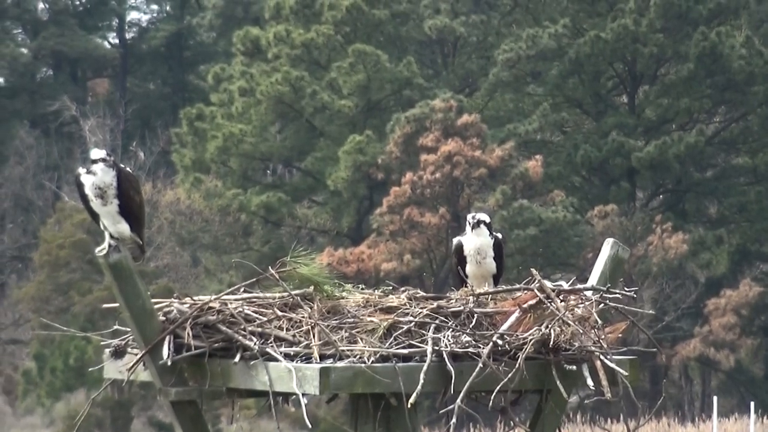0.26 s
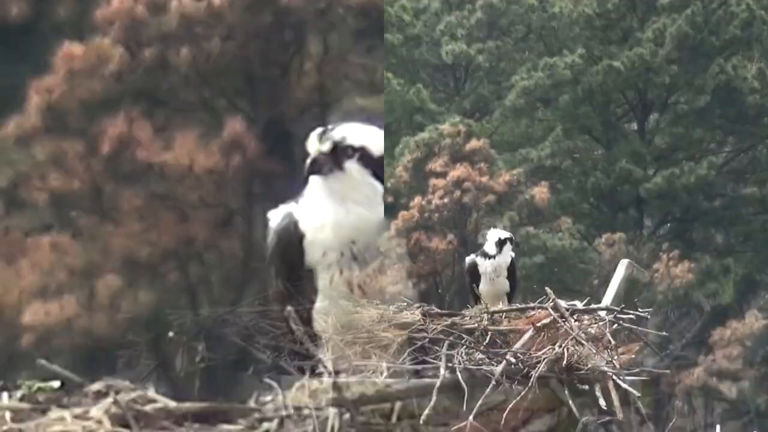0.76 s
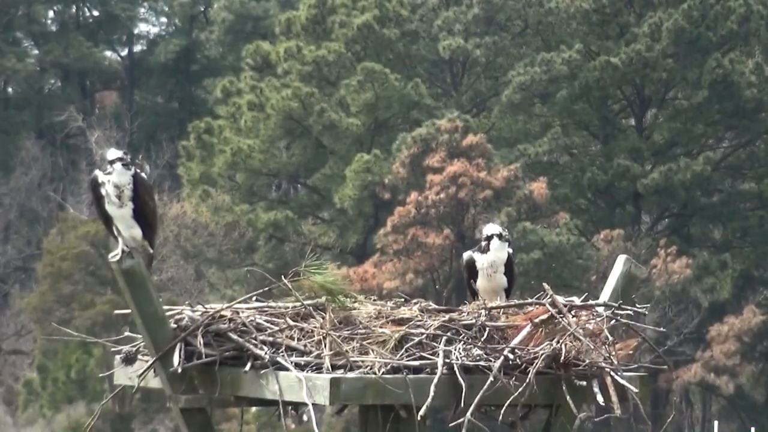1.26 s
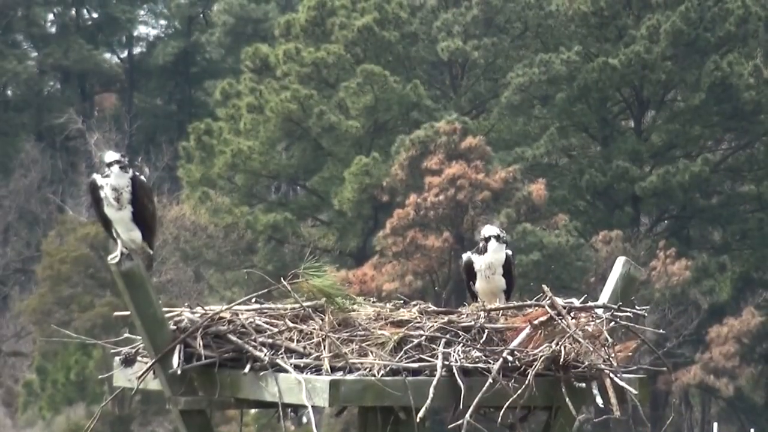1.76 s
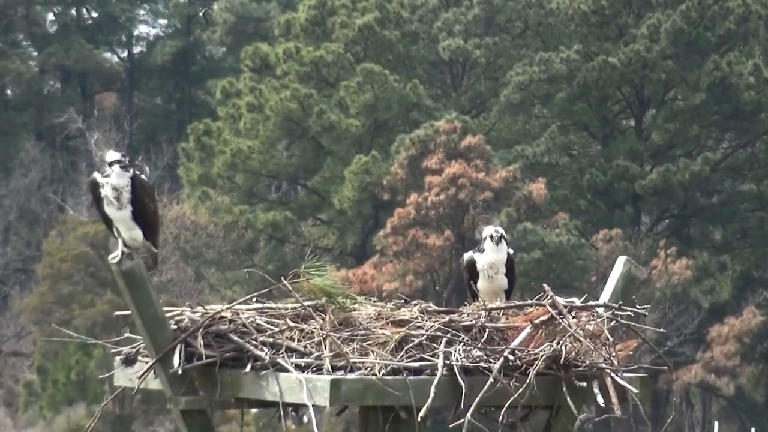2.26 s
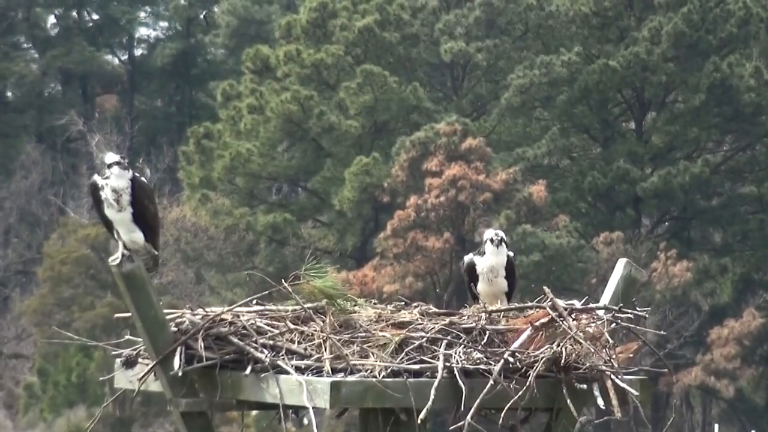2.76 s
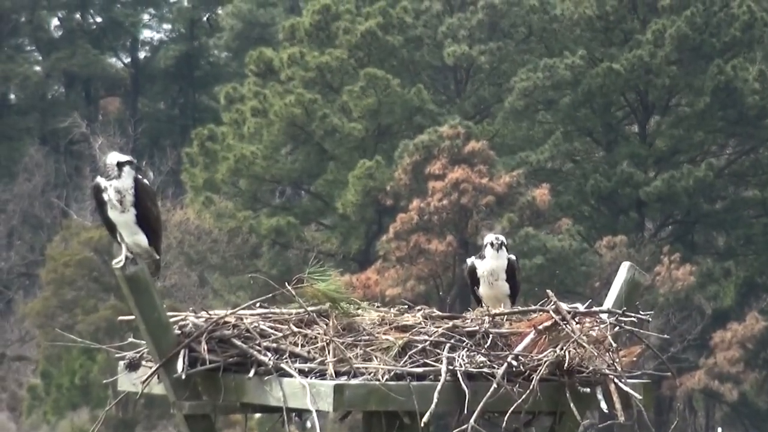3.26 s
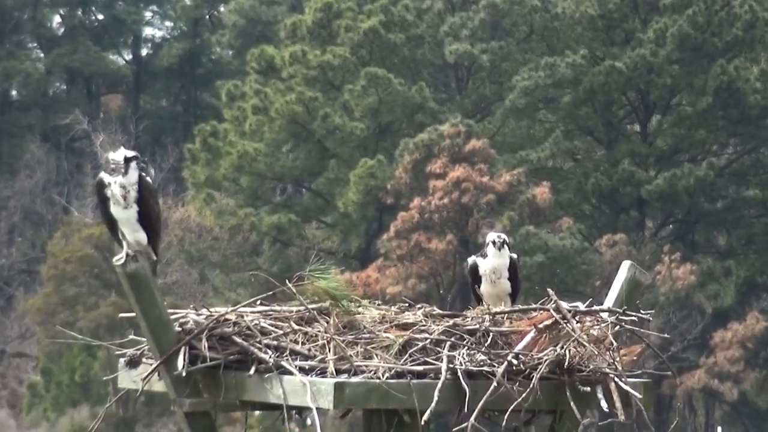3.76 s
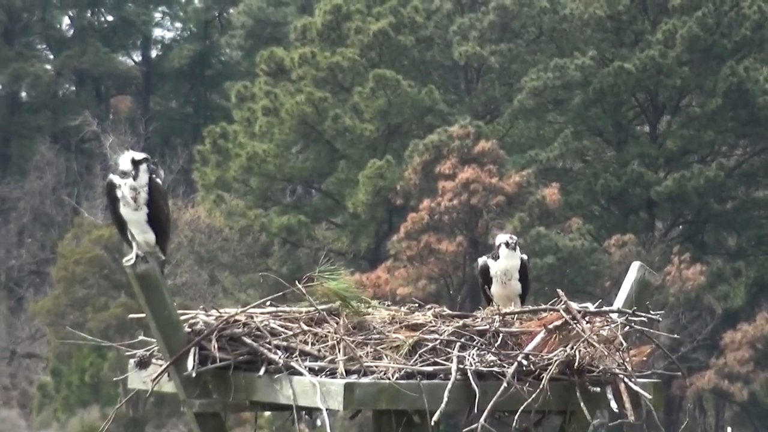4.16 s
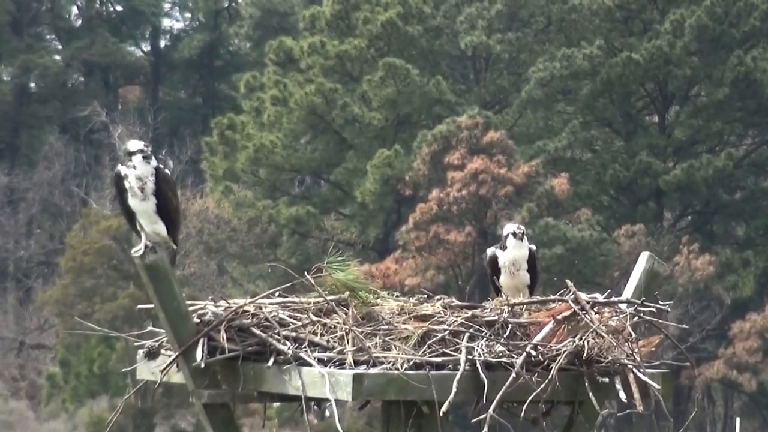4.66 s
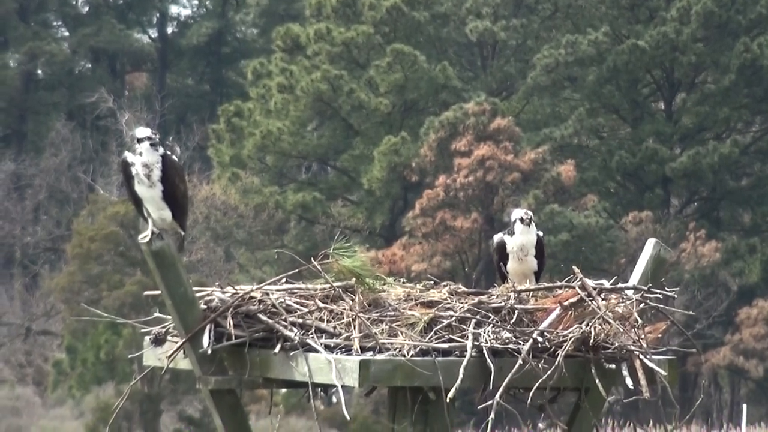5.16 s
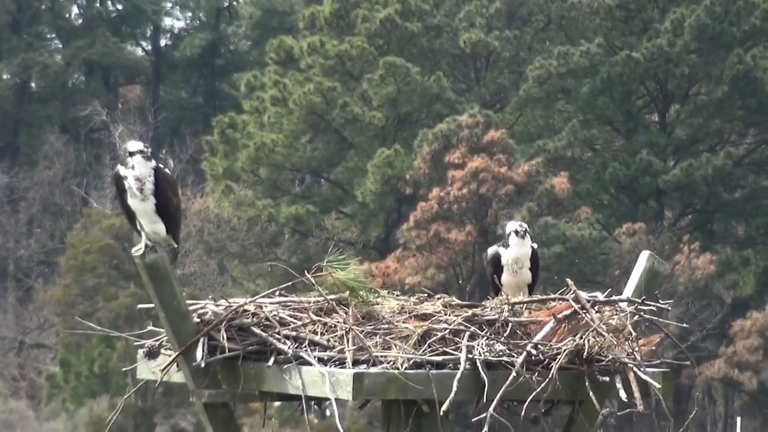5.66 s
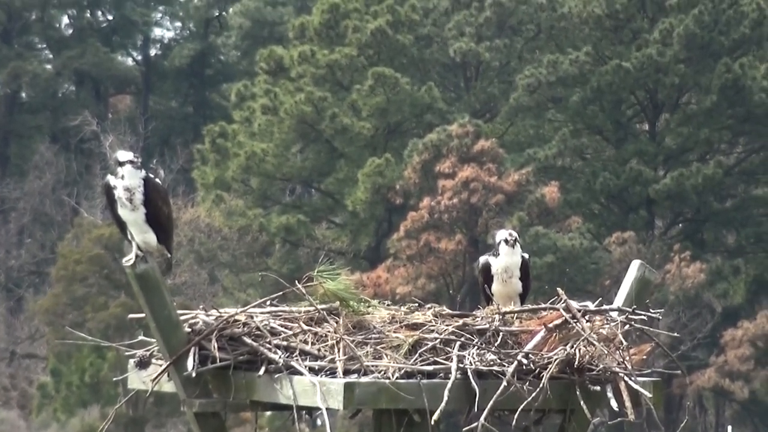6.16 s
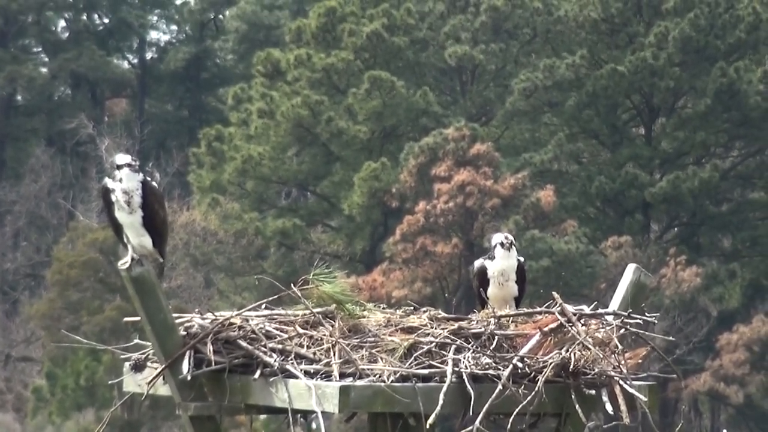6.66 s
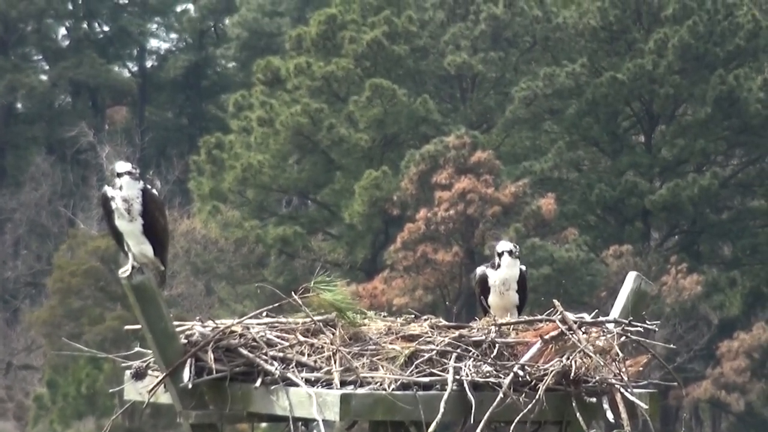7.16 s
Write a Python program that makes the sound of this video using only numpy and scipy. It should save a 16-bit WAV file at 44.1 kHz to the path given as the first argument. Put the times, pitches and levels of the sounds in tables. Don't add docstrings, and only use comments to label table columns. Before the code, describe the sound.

Sharp breaking osprey whistles in two quick bursts with a pause between, over low wind rumble, soft hiss and a faint engine drone.

```python
import sys
import numpy as np
from scipy import signal
from scipy.fft import rfft, irfft, next_fast_len
from scipy.io import wavfile
from scipy.ndimage import uniform_filter1d, map_coordinates

SR = 44100
rng = np.random.default_rng(int(sys.argv[2]) if len(sys.argv) > 2 else 0)


def unload_wav(signal):
    wavfile.write(
        sys.argv[1],
        SR,
        np.round(np.clip(np.atleast_2d(signal).T, -1, 1) * 32767).astype(np.int16),
    )


def linear_from_db(decibels):
    return 10 ** (np.asarray(decibels, float) / 20)


N = 326340

# register break in seconds, low lead-in in seconds,
# high arc in seconds, crest in Hz, level in dB.
CALLER_CHIRPS = [(.956, 0.022, 0.063, 2737.5, -24.5), (1.163, 0.026, 0.062, 2753.5, -28),
                 (1.343, .027, 0.068, 2778.5, -26), (1.539, 0.029, 0.063, 2830, -25),
                 (1.727, 0.026, 0.071, 2807, -25), (1.94, 0.041, 0.057, 2784.5, -27),
                 (2.149, 0.038, 0.053, 2719.5, -23), (3.919, 0.028, 0, 0, -24),
                 (4.097, 0.028, 0.069, 2957, -25), (4.277, 0.023, 0.076, 2886, -28.5),
                 (4.471, 0.03, 0.072, 2882.5, -25.5), (4.653, 0.024, 0.071, 2878.5, -21.5),
                 (4.851, 0.03, 0.066, 2874, -19.5), (5.035, 0.031, 0.065, 2852, -17.5),
                 (5.225, .029, 0.069, 2818, -19.5), (5.428, 0.003, 0.056, 2810, -23.5),
                 (5.65, 0.077, 0.0026, 0, -22.5)]
# start in seconds, length in seconds, crest in Hz, level in dB.
UNBROKEN_CHIRPS = [
    (2.342, 0.089, 2128, -28.5),
    (2.579, 0.079, 2090, -55),
    (3.715, 0.094, 2734, -35.5),
]
# start and length in seconds, from Hz, to Hz, level in dB.
VOICE_CRACKS = [
    (3.912, 0.031, 2974, 3400, -32),
    (4.116, 0.02, 3630, 3694, -36),
]
# start and length in seconds, from Hz, to Hz, level in dB.
FALLING_ENDS = [
    (.811, 0.02, 2634, 2450, -36),
    (3.949, 0.035, 2880, 2480, -31.5),
    (5.65, 0.038, 2730, 2360, -22.5),
]
# start and length in seconds, from Hz, to Hz, level in dB.
TIRED_LEADS = [
    (5.389, 0.049, 1894, 2500, -36.5),
]
# start and length in seconds,
# from Hz, to Hz, level in dB.
MATE_WHISTLES = [(1.275, .042, 2000, 1863, -58), (2.426, 0.059, 2380, 1891, -41.5),
                 (2.835, .035, 2270, 2340, -59), (2.885, .03, 2380, 2480, -57),
                 (3.601, .054, 2360, 2320, -64.5), (3.619, .023, 2620, 2627, -54),
                 (3.669, .033, 1840, 2851, -53.5), (3.703, .018, 3000, 2206, -49.5),
                 (3.742, 0.033, 1780, 1920, -42.5), (3.858, .026, 1840, 2100, -56),
                 (3.88, .038, 2400, 2150, -37.5), (4.39, .055, 2000, 1796, -54.5),
                 (5.326, .024, 2910, 3520, -59), (5.686, .041, 2300, 1910, -41),
                 (5.761, .084, 2230, 2330, -64), (7.022, .085, 2700, 1987, -33.5)]
# share of length, pitch in Hz, level in dB.
LEAD_SHAPE = [(0.079, 1876, -21), (.35, 2020, -4.5), (.6, 2110, -4), (1, 2160, -0.5)]
# share of length, pitch over crest, level in dB.
ARC_SHAPE = [(0, .965, -3.5), (.25, .998, 0.5), (.68, 1, -1.5), (.82, 0.95, 0.5), (1, 0.92, -3.5)]
# share of length, pitch over crest, level in dB.
UNBROKEN_SHAPE = [(0, .87, -14), (.28, .96, -5.5), (.57, 0.98, -1), (.79, .955, -4), (1, 0.87, -15)]
# share of length, pitch over the straight line, level in dB.
GLIDE_SHAPE = [(0, 1, -6), (.45, 1.03, 2), (1, 1, -16.5)]
FALL_SHAPE = [(0, 1, 0.5), (.4, 0.98, -1), (1, 1, -20.5)]
CRACK_SHAPE = [(0, 1, -2.5), (.45, 1, -1), (1, 1, -1.5)]
# time in seconds, amount in dB.
HOARSENESS = [(3.6, 0), (3.75, 3), (3.95, 4.5), (4.15, 2.5), (4.3, 2.5), (4.5, 1.5), (5.3, -3.5),
              (5.6, 2.5)]
LOW_OVERTONES = [-14, -21, -34, -51]
HIGH_OVERTONES = [-22.5, -27, -32.5, -49]
MATE_OVERTONES = [-34.5, -47]
# centre in Hz, width in Hz, then a list of mixtures,
# each a multiple of the note, plus or minus the buzz, level in dB.
BUZZ_UNDER_HIGH = (2180, 290, [(0, 1, -22), (1, 1, -31), (2, -1, -29), (2, 1, -36), (3, -1, -41),
                   (4, 1, -50)])
BUZZ_UNDER_LOW = (2750, 170, [(0, 1, -24), (1, 1, -30), (2, 1, -38), (3, -1, -35)])
# frequency in Hz, level in dB.
BEAK_COLOUR = [(3700, 12), (4100, -5), (4500, -3.5), (5200, 2), (5700, 0), (5950, -11.5), (7700, 4.5),
               (8400, -8), (9000, -11), (16000, -8)]
# centre in Hz, width in Hz, level in dB.
THROAT_RESONANCES = [(2310, 2400, -4.5), (3770, 1400, -4.5), (6900, 2000, -7.5), (12500, 7000, -19.5)]
# frequency in Hz, seconds to fall by 60 dB.
TREE_FADE = [(1500, 0.49), (3000, 0.31), (6000, 0.3), (12000, 0.07)]
# start in seconds, pitch in Hz, level in dB.
PEEPS = [(1.094, 3360, -59.5), (2.49, 3370, -62), (2.727, 3300, -63), (4.019, 3280, -58),
         (4.233, 3360, -56), (5.532, 3470, -57), (5.756, 3360, -55.5), (5.985, 3350, -60),
         (7.215, 3500, -62), (7.255, 3300, -65), (7.33, 3400, -61)]
# peak in seconds, half width in seconds, thump in dB.
GUSTS = [(0.082, 0.057, -17.5), (.3, 0.19, -21), (.55, 0.11, -20), (.76, 0.12, -17.5), (1.751, 0.23, -38.5),
         (2.021, 0.085, -27), (2.87, 0.039, -15), (3.06, 0.076, -24), (3.3, 0.18, -31.5),
         (3.65, 0.11, -38.5), (3.88, 0.14, -32), (4.01, 0.059, -19.5), (4.201, .12, -20),
         (4.42, 0.062, -14.5), (4.62, 0.18, -36.5), (5.581, 0.13, -27), (6.051, 0.16, -28.5),
         (6.37, 0.14, -18.5), (6.7, 0.099, -22), (6.95, 0.1, -22.5), (7.019, 0.17, -18),
         (7.172, 0.049, -21.5), (7.346, 0.033, -14)]
# level in dB under a thump of -30 dB, growth in dB per dB of thump.
SHOT_FLUTTER = [
    (-47.5, 1.61),
    (-45, 0.576),
    (-39.5, 0.88),
]
# frequency in Hz, density in dB per Hz.
THUMP_COLOUR = [(5, 23), (15, 18), (30, 18.5), (50, 7.5), (70, 2), (110, -64.5)]
FLUTTER_COLOUR = [(30, -41), (60, 1.5), (80, 0.5), (150, -5.5), (220, -17), (350, -25.5), (700, -70)]
# start in seconds, peak in dB,
# centre in Hz, width in octaves, length in seconds.
CREAKS = [(0.137, -49, 1480, 0.92, 0.0083), (0.596, -44.5, 1300, 1.25, 0.0083),
          (3.276, -62, 1400, 1.1, 0.0069), (5.37, -39, 1930, 0.59, 0.0065), (5.559, -32, 3270, 0.67, 0.014),
          (5.667, -35, 800, 0.88, 0.0096), (5.783, -45, 3470, 0.33, 0.01),
          (5.903, -67.5, 5020, 0.77, 0.0065), (6.016, -47, 3780, 0.31, 0.0071),
          (6.121, -41.5, 1790, 1.6, 0.0075), (6.388, -53, 4400, 0.4, 0.22),
          (6.576, -28, 1468, 1.59, 0.0067), (6.817, -37, 1800, 1.6, 0.0079),
          (6.974, -37.5, 9300, 2.3, 0.00077), (6.9787, -36.5, 8420, 1.5, 0.0075),
          (7.205, -60, 3240, 0.38, 0.12), (7.395, -64, 3080, 1.5, 0.0031)]
# time in seconds, firing rate in Hz, level in dB.
ENGINE_PATH = [
    (0.83, 43.38, -50.5),
    (2.37, 41.02, -50.5),
    (6.9, 42, -53),
]
# multiple of the firing rate, level in dB.
ENGINE_ORDERS = [(1, -12), (2, 0), (3, -2), (4, -10), (5, -11)]
# surf in dB, leaves in dB, circuit hiss in dB at the start,
# creep of the automatic gain in dB per second.
SHOT_AIR = [
    (-56.5, -65, -81.5, -2.5),
    (-56.5, -62, -70, 1.0945),
    (-54.5, -57.5, -67.5, -7),
]
# peak in seconds, half width in seconds, rise in dB.
BREAKERS = [
    (3.5, 0.21, 3.5),
    (6.25, 0.41, 4.5),
]
# frequency in Hz, density in dB per Hz.
SURF_COLOUR = [(90, -38.5), (150, -3.5), (230, -5.5), (290, -1.5), (355, -10.5), (410, 0), (470, -8),
               (560, -4.5), (700, -12.5), (1200, -29.5), (2600, -120)]
LEAVES_COLOUR = [(400, -28), (700, -5.5), (1100, -3), (1600, -8.5), (1850, -12), (3200, -15.5), (4500, -33),
                 (9000, -120)]
HISS_COLOUR = [(2000, -35.5), (3500, -4), (5000, -3), (8000, -5), (11200, -4.5), (11400, -2.5),
               (14000, -2.5), (16400, -2)]
# frequency in Hz, likeness from 0 to 1.
ALIKE = [(60, .45), (130, 0.99), (290, 0.87), (640, .5), (1400, 0.65), (3100, 0.74), (6800, 0.028),
         (11000, .05)]
# frequency in Hz, left minus right in dB.
PORT_LEAN = [(60, 0.5), (180, -3.5), (550, -3), (1650, -4), (4970, 0), (15000, -1.5)]
CUTS = [.8065, 6.9703]


def raptors():
    leads, arcs = chirps()
    low, low_effort = whistles(leads, LOW_OVERTONES, .0015, BUZZ_UNDER_LOW)
    high, high_effort = whistles(arcs, HIGH_OVERTONES, .0015, BUZZ_UNDER_HIGH)
    flip, flip_effort = whistles(glides(VOICE_CRACKS, CRACK_SHAPE), MATE_OVERTONES[:1], .0016)
    t = np.arange(N) / SR
    cracked = sum(1. * (t > s) * (t < s + length) for s, length, *_ in VOICE_CRACKS)
    duck = linear_from_db(-15 * uniform_filter1d(cracked, size=200))

    def throat(f):
        return sum(linear_from_db(db) * (f * w / np.abs(c * c - f * f + 1j * f * w)) ** 2
                   for c, w, db in THROAT_RESONANCES)

    breath = unit(filtered(rng.standard_normal(N), throat))
    effort = low_effort + high_effort + flip_effort
    rasp = breath * linear_from_db(-27.5 - .2 * curves(HOARSENESS)[0]) * effort
    mate = whistles(glides(MATE_WHISTLES), MATE_OVERTONES, edge=.002)[0]
    return low + high * duck + flip + rasp + mate


def chirps():
    lead_db, lead_follows = -29, .43
    bow_hz_per_s = 2100
    sag, slack_db = .013, 2.6
    break_hz = 2400
    low, high = glides(TIRED_LEADS), glides(FALLING_ENDS, FALL_SHAPE)
    for s, lead, length, crest, db in CALLER_CHIRPS:
        if lead > 0:
            rows = shaped(LEAD_SHAPE, s - lead, lead, lambda u: 1, lead_db + lead_follows * (db + 25))
            bow = bow_hz_per_s * (lead - .03)
            low.append([(t, hz + 4 * u * (1 - u) * bow, g)
                        for (t, hz, g), (u, *_) in zip(rows, LEAD_SHAPE)])
        if length > 0:
            hoarse = max(np.interp(s, *np.transpose(HOARSENESS)), 0)
            arc = []
            for t, hz, g in shaped(ARC_SHAPE, s, length, lambda u: crest, db):
                tiring = hoarse * ((t - s) / length) ** 3
                arc.append((t, hz * (1 - sag * tiring), g - slack_db * tiring))
            high.append(arc)
    for s, length, hz, db in UNBROKEN_CHIRPS:
        register = low if hz < break_hz else high
        register.append(shaped(UNBROKEN_SHAPE, s, length, lambda u: hz, db))
    return low, high


def glides(rows, template=GLIDE_SHAPE):
    return [shaped(template, s, length, lambda u: a + (b - a) * u, db) for s, length, a, b, db in rows]


def shaped(template, start, length, hz, db):
    return [(start + u * length, p * hz(u), db + g) for u, p, g in template]


def whistles(notes, overtones_db, edge, under=None):
    sound, loud = np.zeros(N), np.zeros(N)
    hoarse = curves(HOARSENESS)[0]
    flutter = wobble(130) * linear_from_db(2.5 * hoarse)
    waver = wobble(130) * linear_from_db(2 * hoarse)
    shimmer = [wobble(110) for _ in overtones_db]
    other, mixing = (buzz(*under[:2]), under[2]) if under else (None, [])
    for note in notes:
        s, hz, db = np.transpose(note)
        i = np.arange(round((s[0] - edge) * SR), round((s[-1] + edge) * SR))
        smooth = np.polyfit(s - s[0], hz, deg=(len(s) + 1) // 2)
        pitch = np.polyval(smooth, i / SR - s[0]) * (1 + .004 * waver[i])
        phase = 2 * np.pi * np.cumsum(pitch) / SR
        fade = np.clip(np.minimum(i - i[0], i[-1] - i) / (2 * edge * SR), 0, 1)
        level = uniform_filter1d(linear_from_db(np.interp(i / SR, s, db)), size=130) * fade * linear_from_db(.9 * flutter[i])
        strain_db = min(.45 * abs(db.max() + 26), 6)
        tone = np.sin(phase)
        for k, g in enumerate(overtones_db, start=2):
            colour_db = along(BEAK_COLOUR, k * pitch) + 5 * np.tanh(shimmer[k - 2][i])
            tone = tone + linear_from_db(g + strain_db + colour_db) * np.sin(k * phase)
        for k, sign, g in mixing:
            partner = other[i] if sign > 0 else other[i].conj()
            tone = tone + linear_from_db(g + strain_db) * np.real(np.exp(1j * k * phase) * partner)
        sound[i] += np.sqrt(2) * level * tone
        loud[i] += level
    return sound, loud


def buzz(centre_hz, width_hz):
    shape = lambda f: np.exp(-((f - centre_hz) / width_hz) ** 2) * np.array([[1], [-1j]])
    real, imag = unit(filtered(rng.standard_normal(N), shape))
    return (real + 1j * imag) / np.sqrt(2) * linear_from_db(curves(HOARSENESS)[0])


def trees(x):
    hz, t, z = signal.stft(rng.standard_normal((2, SR)), SR, nperseg=256)
    fade_db = -60 * t / along(TREE_FADE, hz)[:, None] + 4 * rng.standard_normal(len(t))
    tail = signal.istft(z * linear_from_db(fade_db), SR, nperseg=256)[1]
    t = np.arange(tail.shape[1]) / SR
    near = rng.standard_normal(tail.shape) * linear_from_db(-60 * t / .1)
    bank = rng.standard_normal(tail.shape) * linear_from_db(-60 * np.abs(t - .238) / .14)
    bank = uniform_filter1d(bank, size=5, axis=1)
    parts = [(-26, tail), (-16, near), (-37, bank)]
    space = sum(linear_from_db(db) * part / np.linalg.norm(part[0]) for db, part in parts)
    return signal.fftconvolve(x[None], space, axes=1)[:, :N]


def songbirds():
    length, fall = .023, .88
    rows = [(s, length, hz, hz * fall, db) for s, hz, db in PEEPS]
    return whistles(glides(rows), [-30], edge=.004)[0]


def wind():
    calm_db = -46
    t, shot = np.arange(0, N, 50) / SR, shots()[0][::50]
    gusts = sum(linear_from_db(db) * np.exp(-((t - s) / half) ** 2) * (shot == np.searchsorted(CUTS, s))
                for s, half, db in GUSTS)
    thump_db = 20 * np.log10(linear_from_db(calm_db) + gusts)
    base_db, growth = np.array(SHOT_FLUTTER)[shot].T
    flutter_db = base_db + growth * (thump_db + 30)
    thump_db, flutter_db = curves(np.transpose([t, thump_db, flutter_db]))
    thump = rush(THUMP_COLOUR, [(30, .59)], patchy_db=-2)
    power = uniform_filter1d(thump ** 2, size=3500).mean(axis=0)
    thump = unit(thump / (power + .063) ** .43)
    lumps = linear_from_db(.28 * np.array([wobble(32), wobble(16)]) + .63 * wobble(20))
    flutter = unit(lumps * rush(FLUTTER_COLOUR, [(100, .15)], patchy_db=2.5))
    return linear_from_db(thump_db) * thump + linear_from_db(flutter_db) * flutter


def creaks():
    out, t = np.zeros((2, N + SR)), np.arange(8192) / SR
    hz = np.fft.rfftfreq(8192, 1 / SR) + 1
    for s, db, centre_hz, octaves, length in CREAKS:
        band = np.exp(-(np.log2(hz / centre_hz) / octaves) ** 2)
        noise = [[1, -.12], [1, -1.6]] @ rng.standard_normal((2, 8192))
        burst = unit(irfft(rfft(noise) * band))
        u = t / max(length, .0003) * 3
        start = round(s * SR)
        out[:, start:start + 8192] += linear_from_db(db - .9) * burst * u * np.exp(-u)
    return out[:, :N]


def engine():
    hz, db = curves(ENGINE_PATH)
    phase = 2 * np.pi * np.cumsum(hz) / SR
    drone = sum(linear_from_db(g + 1.6 * wobble(3.1)) * np.sin(k * phase + .27 * wobble(2.8))
                for k, g in ENGINE_ORDERS)
    t = np.arange(N) / SR
    return np.sqrt(2) * linear_from_db(db) * drone * (t > CUTS[0]) * (t < CUTS[1])


def air():
    shot, since = shots()
    surf_db, leaves_db, hiss_db, creep = np.array(SHOT_AIR)[shot].T
    t = np.arange(N) / SR
    swell = .7 * wobble(4) + sum(db * np.exp(-((t - s) / half) ** 2) for s, half, db in BREAKERS)
    surf = linear_from_db(surf_db + swell) * rush(SURF_COLOUR, ALIKE, patchy_db=0.0)
    leaves = linear_from_db(leaves_db + .72 * wobble(10.0)) * rush(LEAVES_COLOUR, ALIKE, patchy_db=-.5)
    hiss = linear_from_db(hiss_db + 4.5) * rush(HISS_COLOUR, ALIKE, patchy_db=1.0)
    return linear_from_db(creep * since) * (surf + leaves + hiss)


def rush(spectrum, alike, patchy_db):
    z = signal.stft(rng.standard_normal((2, N)), nperseg=512)[2]
    field = uniform_filter1d(rng.standard_normal(z.shape[1:]), size=5, axis=0)
    field = uniform_filter1d(field, size=12, axis=1)
    pair = signal.istft(z * linear_from_db(patchy_db * unit(field)), nperseg=512)[1][:, :N]

    def spread(hz):
        turn = np.arccos(np.clip(along(alike, hz), -1, 1)) / 2
        return linear_from_db(along(spectrum, hz)) * [np.cos(turn), np.sin(turn)]

    mid, side = filtered(pair, spread)
    return unit(np.array([mid + side, mid - side]))


def shots():
    t = np.arange(N) / SR
    shot = np.searchsorted(CUTS, t)
    return shot, t - np.array([0, *CUTS])[shot]


def wobble(rate):
    coarse = np.arange(0, N + 32, 32)
    knots = rng.standard_normal(int(N * rate / SR) + 4)
    return np.interp(np.arange(N), coarse, map_coordinates(knots, [coarse * rate / SR]))


def curves(rows):
    s, *cols = np.transpose(rows)
    return [np.interp(np.arange(N) / SR, s, c) for c in cols]


def along(points, hz):
    f, v = np.transpose(points)
    return np.interp(np.log(hz + 1), np.log(f + 1), v)


def filtered(x, response):
    m = next_fast_len(N + SR // 2)
    return irfft(rfft(x, m) * response(np.fft.rfftfreq(m, 1 / SR)), m)[..., :N]


def unit(x):
    return x / np.sqrt(np.mean(x ** 2) + 1e-20)


def scene():
    birds = raptors() + songbirds()
    far = birds + trees(birds) + air() + engine()
    sides = np.array([[1], [-1]])
    lead = lambda hz: np.exp(2j * np.pi * hz * sides * 2.4e-5)
    lean = lambda hz: linear_from_db(along(PORT_LEAN, hz) / 2 * sides)
    return filtered(filtered(far, lead) + wind() + creaks(), lean)


def low_pass(x):
    return signal.sosfilt(signal.butter(12, 17850, fs=SR, output="sos"), x)


def record(dry):
    top_hz, mono_hz = 16550, 11300
    t = np.arange(N) / SR
    dip = np.clip(np.abs(t - CUTS[0] - .002) / .016, .05, 1)
    step = .042 * np.sign(t - CUTS[1]) * np.exp(-np.abs(t - CUTS[1]) / .00048)
    joined = filtered(dry * dip + step, lambda hz: hz < top_hz)
    side = filtered((joined[0] - joined[1]) / 2, lambda hz: np.where(hz < mono_hz, 0, .8))
    return low_pass(joined - [side, -side])


dry = scene()
out = record(dry)
unload_wav(out)
```